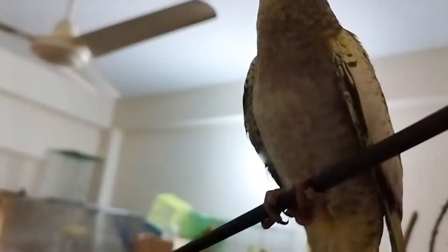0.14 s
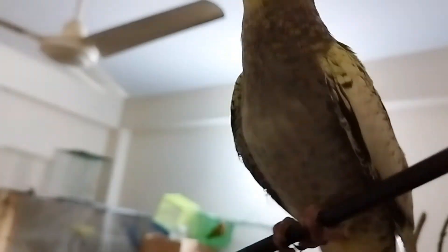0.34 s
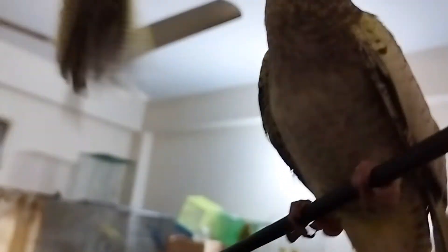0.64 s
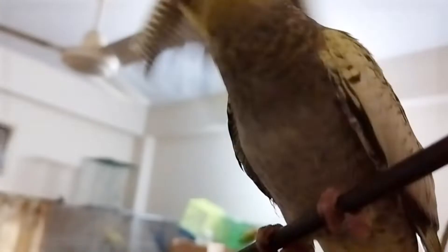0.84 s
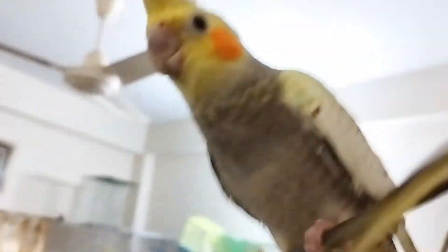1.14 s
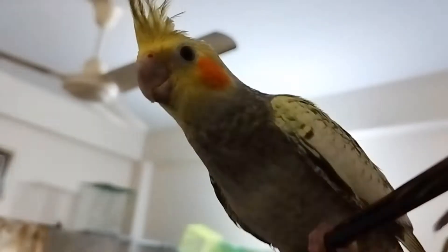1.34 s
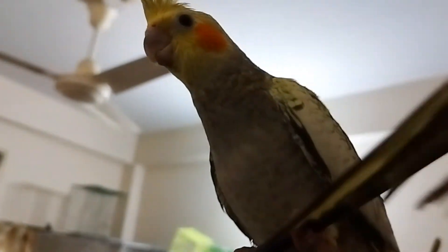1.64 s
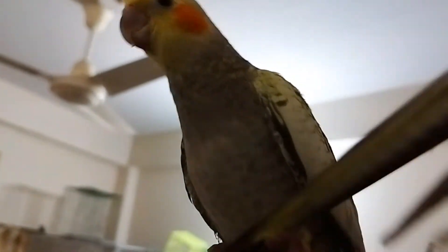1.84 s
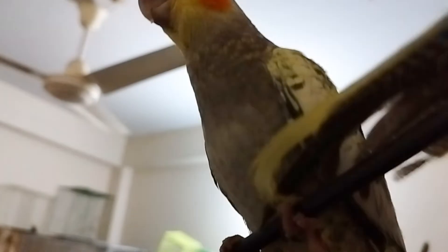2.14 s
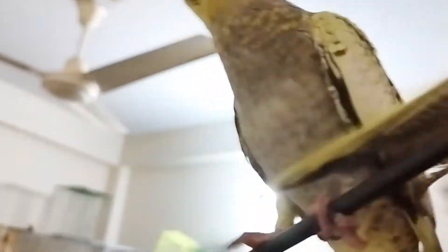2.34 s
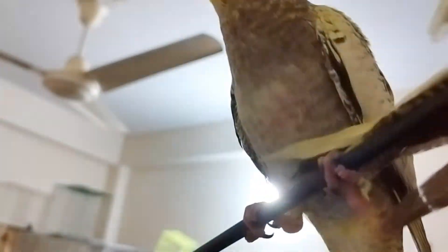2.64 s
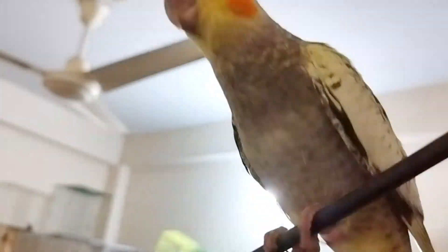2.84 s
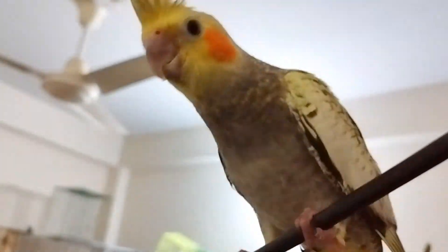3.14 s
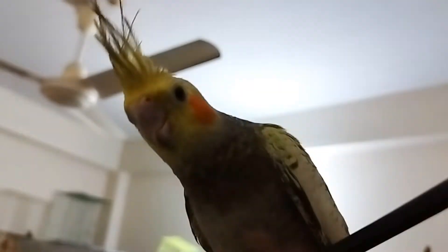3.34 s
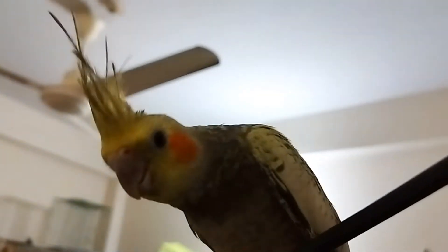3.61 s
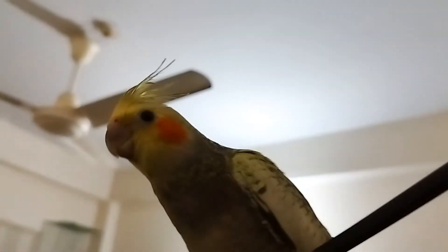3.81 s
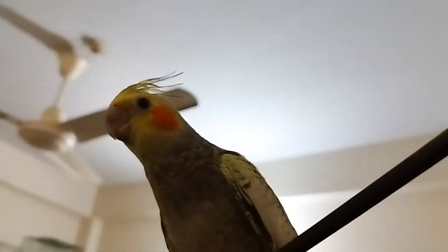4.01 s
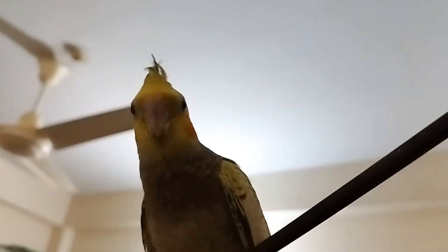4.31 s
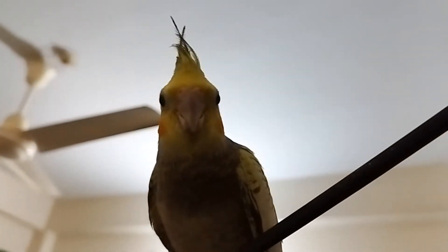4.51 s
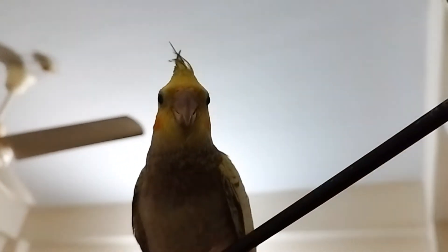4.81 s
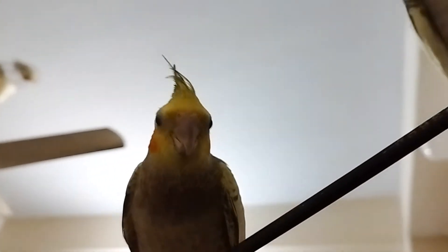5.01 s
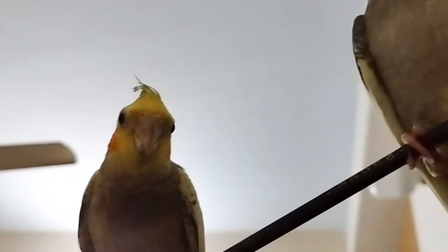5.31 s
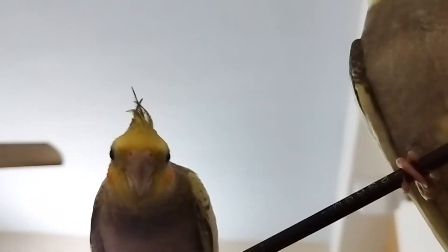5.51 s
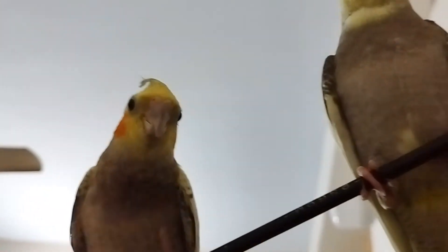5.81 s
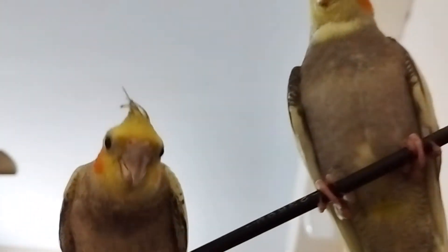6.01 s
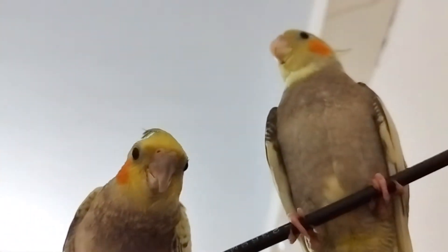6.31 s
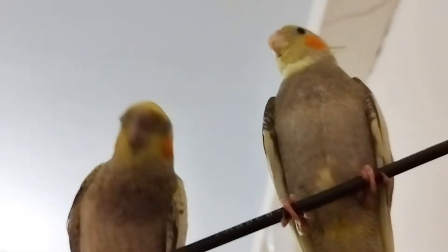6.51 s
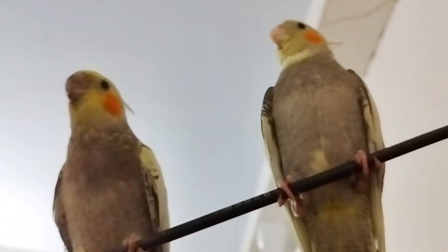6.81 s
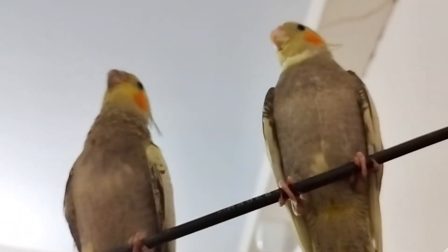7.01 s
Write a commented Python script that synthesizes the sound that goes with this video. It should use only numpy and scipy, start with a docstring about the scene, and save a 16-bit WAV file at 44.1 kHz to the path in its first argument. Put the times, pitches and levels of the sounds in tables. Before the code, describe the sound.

In a quiet room with hard walls, pet cockatiels keep up short, shrill calls near a hand-held microphone. Early on, one flies past with quick soft wingbeats and a brief low buffet of air. The birds whistle and chatter, grow harsher with overlapping squawks and screeches in the middle, and finish with softer chirps and whistles. Faint fan rumble, slight handling rustle and a few tiny ticks lie underneath.

```python
"""Cockatiels in a bare room

Indoors, on a hand-held phone's stereo microphone, with hard walls close by. The birds squawk, screech,
cry, whistle, chatter and chip, each call a vibrating membrane coloured by throat and beak. One flaps
past close enough for its downdraught to thump the microphone; a perch rings, beaks and claws tick.
A ceiling fan and faint handling noise lie underneath. The shrillest peaks overload into a low rasp."""
import sys
import numpy as np
from scipy import signal
from scipy.fft import rfft, irfft, next_fast_len
from scipy.io import wavfile
from scipy.ndimage import uniform_filter1d

SR = 44100
rng = np.random.default_rng(int(sys.argv[2]) if len(sys.argv) > 2 else 0)


def digitize_waveform(pressure):
    """Quantize a signal to 16-bit integers and store it at the path in sys.argv[1].

    Rows of a 2-D input are taken as channels; values are limited to [-1, 1].
    """
    field = np.atleast_2d(pressure).T
    bounded = np.clip(field, -1, 1)
    quanta = np.round(bounded * 32767).astype(np.int16)
    wavfile.write(sys.argv[1], SR, quanta)


N = 315315
TIME = np.arange(N) / SR
TOP_HZ = 14200  # upper limit of the voices and the microphone
POSES = 6  # head positions, each with its own echoes

# throat and beak colour of whistles and chips: frequency_hz, gain_db
CLEAR_THROAT = [(700, -35), (1400, -12.5), (2000, -4), (3200, 1), (4400, 2.5), (5700, -7.5), (7200, -3),
                (9500, -3), (11500, -13), (14000, -25)]
# their shared voice: weak overtones, unsteady when rough
CLEAR_VOICE = dict(slope_db=-14, jitter=.08, waver=.075, shake=.9, half=.45, rasp=.8)


def syrinx(calls, gesture, throat, slope_db, attack_s, release_s, jitter, waver, shake, half, rasp):
    """A membrane vibrates behind a throat, unsteady and hissing when rough. One row per head pose."""
    out = np.zeros((POSES, N))
    hiss = rng.standard_normal(N)
    wobble = jitter * flutter(450) + waver * flutter(110)  # of pitch, fast and slow
    tremor = 2 * np.tanh(flutter(260) / 2)  # of loudness
    for index, (start, length, *columns) in enumerate(calls):
        span = (TIME > start - attack_s) & (TIME < start + length + release_s)
        t = TIME[span] - start
        age = np.clip(t, 0, length)
        hz, db, rough = gesture(age, age / length, *columns)
        rough = np.clip(rough, 0, 1)
        phase = 2 * np.pi * np.cumsum(hz * (1 + rough * wobble[span])) / SR
        # partials tilt by slope_db an octave; the windpipe spreads each pulse in time
        tone = sum(undb(slope_db * np.log2(k)) * np.cos(k * phase + k * k / 2) * (k * hz < TOP_HZ)
                   for k in range(1, 15))
        tone = unit(tone * (1 + half * rough * np.cos(phase / 2)))  # period doubling
        air = rasp * rough ** 2 * hiss[span] * (1 + np.cos(phase))  # one puff a cycle
        voice = colour((tone + air) * np.exp(shake * rough * tremor[span]), throat)
        voice /= np.sqrt(uniform_filter1d(voice ** 2, size=900) + 1e-12)  # even out over 20 ms
        gate = np.clip(t / attack_s + 1, 0, 1) * np.clip((length - t) / release_s + 1, 0, 1)
        out[index % POSES, span] += voice * undb(db) * gate ** 2
    return out


def squawks():
    """Rasping calls that slide up to their pitch."""
    # start_s, length_s, top_pitch_hz, level_db, roughness
    calls = [ (.394, .135, 1574, -18, 0.58), (.913, 0.13, 1506, -19, 0.49), (2.712, 0.099, 1505, -18, 0.79),
             (2.992, 0.13, 1532, -19.5, 0.8), (3.488, 0.093, 1779, -18.5, 0.7),
             (3.745, 0.15, 1509, -19.5, 0.96), (4.305, 0.09, 1540, -17.5, 0.66),
             (4.602, 0.063, 1640, -18.5, 0.95), (4.909, 0.049, 1700, -15.5, .9), ]
    # throat and beak colour: frequency_hz, gain_db
    throat = [(450, -76.5), (850, -19), (1150, -13.5), (1500, -11.5), (2200, -5.5), (2950, 1.5),
              (3650, 1.5), (4250, -2), (4800, -2.5), (6300, -4.5), (7400, -4.5), (10000, -9.5),
              (12000, -23.5), (14500, -22)]
    return syrinx(calls, scoop, throat, slope_db=-.5, attack_s=.005, release_s=.012,
                  jitter=.06, waver=.11, shake=.65, half=.8, rasp=.8)


def screeches():
    """Full-throated held notes with strong, shrill overtones."""
    # start_s, length_s, pitch_hz, level_db, roughness
    calls = [ (1.607, 0.042, 3126, -23, 1.1), (2.645, 0.051, 2230, -26, 0.51),
             (2.782, 0.12, 2138, -19, 0.67), (3.562, 0.11, 2141, -18, 0.59),
             (4.338, 0.13, 2155, -17.5, .52), (4.635, 0.11, 2149, -17.5, 0.51),
             (4.95, 0.087, 2160, -18, 0.47), ]
    # throat and beak colour: frequency_hz, gain_db
    throat = [(700, -5), (1400, 0), (2100, 12.5), (3100, 8), (4200, 7.5), (5000, 15), (6300, 3), (7100, 10),
              (7900, 5.5), (8650, -1), (9300, 2.5), (10200, -6.5), (11300, -12), (14500, -21.5)]
    return syrinx(calls, hold, throat, slope_db=8, attack_s=.012, release_s=.036,
                  jitter=.015, waver=.068, shake=.6, half=.35, rasp=.3)


def cries():
    """Harsh, breathy held notes about an octave below the screeches."""
    # start_s, length_s, pitch_hz, level_db, roughness
    calls = [ (3.39, 0.11, 1281, -32.5, 0.47), (4.156, 0.1, 1121, -19.5, 0.54),
             (6.838, .025, 1365, -40.5, 0.32), (6.92, 0.011, 1510, -38.5, 0.94), ]
    # throat and beak colour: frequency_hz, gain_db
    throat = [(700, -20), (1100, -13.5), (1600, -2.5), (2200, -7.5), (3300, -1), (3800, 1), (4350, 2),
              (5100, -7.5), (6500, -0.5), (7500, -6.5), (10000, -9), (14000, -24.5)]
    return syrinx(calls, hold, throat, slope_db=-1.5, attack_s=.0049, release_s=.016,
                  jitter=.04, waver=.08, shake=.6, half=.3, rasp=1.5)


def whistles():
    """Slurred notes, mostly rising, carried by the first partial."""
    # start_s, length_s, start_pitch_hz, end_pitch_hz, level_db, peak_share, roughness
    calls = [ (1.335, 0.21, 1920, 3130, -16, 0.48, 0.3), (2.19, 0.081, 1950, 1990, -31.5, .9, 1.06),
             (2.262, 0.0498, 1977, 2264, -15.5, 0.7, 0.33), (2.318, 0.12, 2442, 3340, -15, 0.18, 0.43),
             (2.45, 0.05, 3190, 3366, -18.5, 0.27, 0.88), (3.245, 0.074, 2120, 2327, -30.5, 0.45, 0.61),
             (4.065, 0.11, 1964, 2270, -34.5, 0.5, 0.31), (4.565, 0.032, 1850, 2010, -26, .8, 0.2),
             (4.604, 0.057, 2130, 3150, -17.5, 0.49, 0.06), (5.76, 0.091, 2108, 2392, -21.5, 0.42, 0.49),
             (5.92, 0.096, 2660, 2416, -22.5, 0.99, 0.68), (6.02, .04, 2950, 3125, -20, 0.52, 0.26),
             (6.145, .125, 2000, 2402, -24, 0.6, 0.7), (6.325, 0.094, 3166, 3454, -16, 0.72, 0.21),
             (6.60, 0.087, 2263, 2724, -34, 0.53, 0.95), (6.811, 0.026, 3080, 3900, -24.5, 0.51, 0.26),
             (6.868, .036, 3930, 3940, -27, 0.46, 0.17), (7.10, .07, 2290, 2300, -31, .7, 0.88), ]
    return syrinx(calls, slur, CLEAR_THROAT, attack_s=.006, release_s=.025, **CLEAR_VOICE)


def chatter():
    """Reedy slurred notes with a strong second partial."""
    # start_s, length_s, start_pitch_hz, end_pitch_hz, level_db, peak_share, roughness
    calls = [ (0, 0.0083, 2246, 2277, -19, 0.068, 1.11), (1.245, 0.076, 1794, 1875, -34.5, 0.35, 0.48),
             (1.83, .04, 1860, 1760, -32.5, .2, 0.57), (2.42, 0.29, 1733, 1823, -23.5, 0.23, 0.7),
             (5.82, 0.15, 1955, 1934, -26.5, 0.067, 0.65), (6.11, .10, 1767, 1993, -28, 0.24, 0.42),
             (6.235, 0.085, 1806, 1663, -23.5, 0.19, 0.45), ]
    # throat and beak colour: frequency_hz, gain_db
    throat = [(700, -33), (1200, -5.5), (1750, -6.5), (2500, -1.5), (3500, 4.5), (4400, -4.5), (5500, -5.5),
              (7200, -7.5), (9500, -13), (11500, -29.5), (14000, -31)]
    return syrinx(calls, slur, throat, slope_db=-3, attack_s=.01, release_s=.02,
                  jitter=.06, waver=.08, shake=.8, half=.25, rasp=.6)


def chips():
    """Small down-slurred notes in the whistling voice."""
    # start_s, length_s, start_pitch_hz, level_db, roughness
    calls = [ (1.824, 0.0116, 5070, -26.5, 0.37), (1.895, 0.076, 3150, -33.5, 0.52),
             (4.72, .058, 3004, -28.5, 0.07), (5.355, 0.099, 3120, -37, 0.54),
             (5.712, 0.035, 3680, -38, 0.26), (6.40, 0.051, 3150, -26.5, .38),
             (6.995, 0.06, 3146, -35.5, 0.55), (7.126, .08, 3730, -30.5, .04), ]
    return syrinx(calls, drop, CLEAR_THROAT, attack_s=.006, release_s=.02, **CLEAR_VOICE)


def scoop(age, share, hz, db, rough, depth=.43, rise_s=.04, swell_s=.011):
    """Pitch and loudness climb as the pressure builds, and the bird tires at the end."""
    pitch = hz * (1 - depth * np.exp(-age / rise_s))
    level = db - 2.5 * np.exp(-age / swell_s) - 4.5 * share ** 4
    return pitch, level, rough


def hold(age, share, hz, db, rough, depth=.05, rise_s=.01413, sag_per_s=.42, crack=.308):
    """The voice cracks up onto its note, rougher at first, then sags slowly."""
    onset = np.exp(-age / rise_s)
    pitch = hz * (1 - depth * onset - sag_per_s * age)
    return pitch, db + arch(share, peak=.51, edge_db=2.5), rough + crack * onset


def slur(age, share, start_hz, end_hz, db, peak, rough, glide_s=.06):
    """The note eases from one pitch to another and levels off if it lasts."""
    ease = 1 - np.exp(-(age / glide_s) ** 1.45)
    pitch = start_hz + (end_hz - start_hz) * ease / ease[-1]
    return pitch, db + arch(share, peak, edge_db=8), rough


def drop(age, share, hz, db, rough, fall=.28):
    """The pitch falls evenly by a set share, at a steady level."""
    return hz * (1 - fall * share), db, rough


def arch(share, peak, edge_db):
    """Loudness over a call in dB: 0 at the peak, edge_db softer at both ends."""
    peak = np.clip(peak, .05, .95)
    return -edge_db * np.maximum((peak - share) / peak, (share - peak) / (1 - peak)) ** 2


def wings(gust_pan_db=16, wide_eddy_hz=114):
    """A close fly-past: strokes pull on both microphone ports together, eddies buffet each on its own."""
    # dips in air pressure: centre_s, width_s, level_db
    strokes = [(.563, .006, -28), (.683, .007, -28), (.801, .006, -18), (.921, .006, -17),
               (1.027, .006, -25), (1.14, .006, -15), (1.322, .006, -18)]
    # downdraught on the microphone: centre_s, width_s, level_db, cutoff_hz
    gusts = [ (1.158, 0.022, -25.5, 128), (1.208, 0.032, -25.5, 260), (1.283, 0.011, -23, 444),
             (1.313, 0.024, -24.5, 169), (1.396, .015, -32, 370), (1.57, 0.1, -28, 65.4),
             (1.679, 0.0073, -28, 220), (1.729, 0.022, -28.5, 130), ]
    out = np.zeros((2, N))
    for centre, width, db in strokes:
        out -= undb(db) * pan(3) * bump(centre, width)
    for centre, width, db, hz in gusts:
        span = np.abs(TIME - centre) < 1 / 6
        swell = bump(centre, width)[span]
        turbulence = butter(rng.standard_normal((2, len(swell))), hz, order=3)
        eddies = swell * butter(turbulence, 22, "high")
        eddies *= np.sqrt(np.sum(swell ** 2) / np.sum(eddies ** 2, axis=1, keepdims=True))
        # small eddies strike the left port; slower, wider ones reach both
        side = pan(gust_pan_db * (1 - np.exp(-(hz / wide_eddy_hz) ** 2)))
        out[:, span] += undb(db) * side * eddies
    return out


def ticks(decay_s=.036):
    """Little clicks of beak and claw on the perch."""
    # start_s, level_db
    taps = [(1.905, -35), (5.632, -35), (6.54, -37)]
    blows = sum(undb(db) * (TIME >= start) * np.exp(-np.abs(TIME - start) / decay_s)
                for start, db in taps)
    return blows * unit(butter(rng.standard_normal(N), [2000, 9000], "band"))


def perch(start_s=1.72, pitch_hz=312, level_db=-49, t60_s=1.8):
    """The bumped metal rod rings faintly in one bending mode."""
    age = np.maximum(TIME - start_s, 0)
    return undb(level_db) * np.sin(2 * np.pi * pitch_hz * age) * undb(-60 * age / t60_s)


def fan(level_db=-45, sway_db=4.5):
    """Soft, unsteady rumble of air moved by the ceiling fan."""
    # spectrum of the moving air: frequency_hz, gain_db
    spectrum = [(25, 7), (60, 1.5), (120, -5.5), (250, -13.5), (500, -15), (1000, -20), (3000, -25.5),
                (6000, -32), (14000, -32.5)]
    noise = rng.standard_normal((3, N))  # left, right, common to both
    air = unit(colour(noise[:2] + noise[2], spectrum))
    return air * pan(1) * undb(level_db + sway_db * flutter(13.5))


def handling(creep_db=-60, sway_db=1.9):
    """Fingers creep unevenly on the phone's case and now and then shift their grip."""
    # soft low rustles: centre_s, width_s, level_db
    rustles = [(2.23, 0.073, -44), (5.37, 0.063, -40.5), (5.9, 0.11, -55), (6.657, 0.11, -43.5)]
    rub = unit(butter(rng.standard_normal((2, N)), [110, 300], "band"))
    shifts = sum(undb(db) * bump(centre, width) for centre, width, db in rustles)
    return rub * pan(2) * (undb(creep_db) + shifts) * undb(sway_db * flutter(17.4))


def room(build_s=.00075, early_db=3, early_s=.02):
    """Strong first reflections from near walls, then a tail that lingers longest in the midrange."""
    # reverberation time: frequency_hz, t60_s
    decay = [(200, 0.14), (1500, 1), (3000, 0.92), (5000, 0.77), (8000, 0.7), (14000, 0.35)]
    t = TIME[:SR]
    noise = rng.standard_normal((2, SR))
    edges_hz = np.geomspace(100, 16000, 11)
    tail = np.zeros((2, SR))
    for k, (low, high) in enumerate(zip(edges_hz, edges_hz[1:])):
        t60 = at_hz(np.sqrt(low * high), decay)
        tail += butter(noise, [low, high], "band") * undb(-60 * t / t60) * (-1) ** k
    tail *= (1 - np.exp(-t / build_s)) * (1 + undb(early_db) * np.exp(-t / early_s))
    return tail / np.sqrt(np.sum(tail ** 2, axis=1, keepdims=True))


def place(poses, echoes, direct_db, room_db, pan_db):
    """A source reaches the microphone directly and off the walls; each pose has its own echoes."""
    wet = sum(signal.fftconvolve(row[None], echo)[:, :N] for row, echo in zip(poses, echoes))
    return pan(pan_db) * (undb(direct_db) * poses.sum(axis=0) + undb(room_db) * wet)


def undb(db):
    """Decibels to gain."""
    return 10 ** (np.asarray(db) / 20)


def unit(x):
    """Scale to rms 1."""
    return x / np.sqrt(np.mean(x ** 2) + 1e-18)


def pan(db):
    """Stereo gains for a left-minus-right level difference."""
    return undb(np.array([[1], [-1]]) * db / 2)


def bump(centre_s, width_s):
    """A bell-shaped swell of height 1."""
    return np.exp(-.5 * ((TIME - centre_s) / width_s) ** 2)


def at_hz(hz, points):
    """Read (Hz, value) points on a log-frequency axis."""
    points_hz, values = np.transpose(points)
    return np.interp(np.log(hz + 1e-9), np.log(points_hz), values)


def colour(x, points):
    """Filter by a (Hz, dB) outline."""
    n = x.shape[-1]
    size = next_fast_len(n + 512)
    gain = undb(at_hz(np.fft.rfftfreq(size, 1 / SR), points))
    return irfft(rfft(x, size) * gain, size)[..., :n]


def butter(x, hz, kind="low", order=2):
    """Plain low-, high- or band-pass."""
    return signal.sosfilt(signal.butter(order, hz, kind, fs=SR, output="sos"), x)


def flutter(hz):
    """Random wobble up to a given rate, rms 1."""
    return unit(butter(rng.standard_normal(N), hz))


def scene():
    """The birds share one room and turn their heads between calls; wings pass right at the microphone."""
    # where the whistling, chipping and chattering birds sit: time_s, left_minus_right_db
    seats = [(1.4, -6), (2.3, -1.5), (4.6, 0), (5.8, 1.5), (6.4, 1.5), (7.1, 1.5)]
    side_db = np.interp(TIME, *np.transpose(seats))
    echoes = [room() for _ in range(POSES)]
    birds = (place(squawks(), echoes, direct_db=-6.5, room_db=-1, pan_db=-1)
             + place(screeches() + cries(), echoes, direct_db=-8, room_db=2, pan_db=-.8)
             + place(chatter(), echoes, direct_db=-6.5, room_db=-1, pan_db=side_db)
             + place(whistles() + chips(), echoes, direct_db=-5, room_db=-3.5, pan_db=side_db)
             + place(ticks()[None], echoes, direct_db=-33.5, room_db=-1, pan_db=1.5))
    return birds + wings() + perch() + fan() + handling()


def record(dry, headroom=.11, overload=1.96, rasp_hz=600, ceiling=.75):
    """Shrill peaks overload the microphone into a low rasp; peaks are rounded and the top is cut."""
    treble = butter(dry, 7640, "high")
    excess = np.maximum(np.abs(treble) - headroom, 0)
    rasp = butter(excess, rasp_hz, order=1)
    rasp = butter(rasp, .93, "high", order=1)  # the steady offset drains away
    heard = dry - overload * rasp  # overload pushes the wave one way only
    rounded = heard / (1 + (heard / ceiling) ** 6) ** (1 / 6)
    top_cut = signal.ellip(12, .2, 80, TOP_HZ, fs=SR, output="sos")
    return signal.sosfilt(top_cut, rounded)


dry = scene()
out = record(dry)
digitize_waveform(out)
```